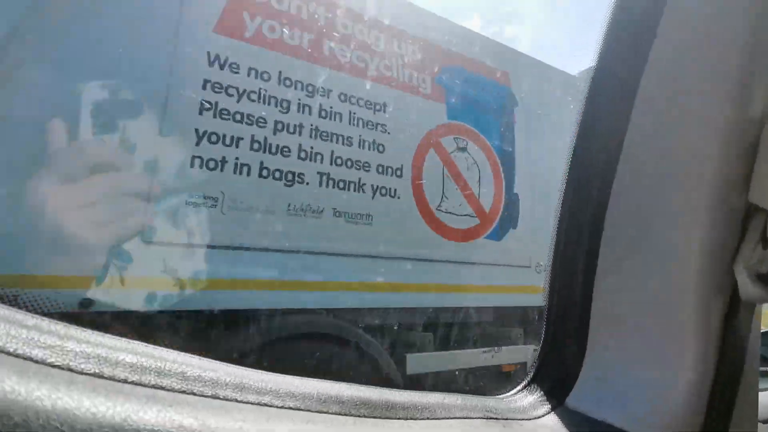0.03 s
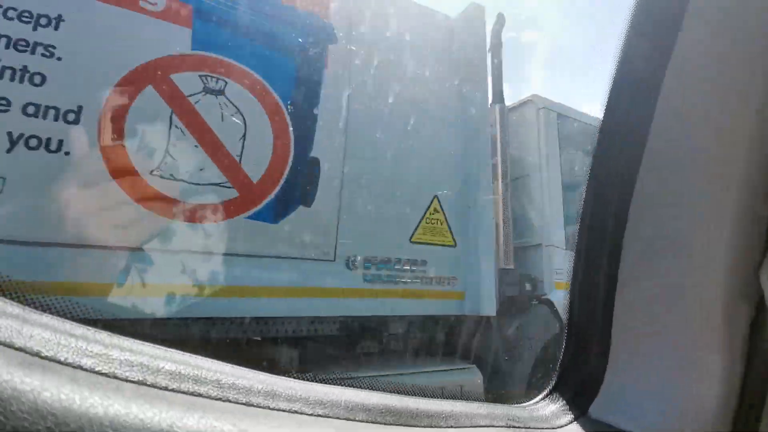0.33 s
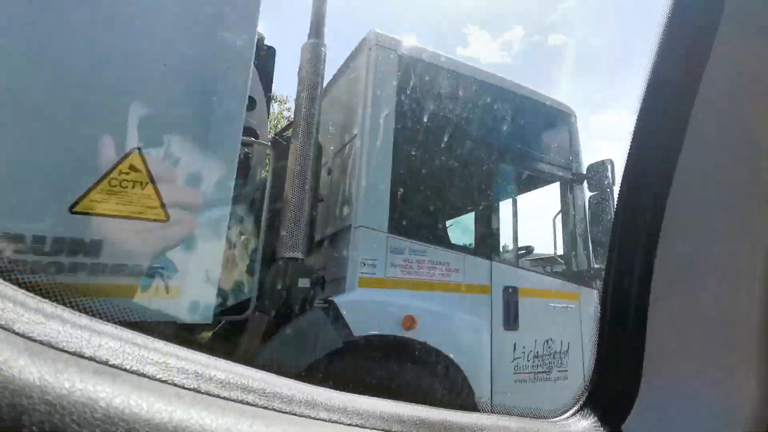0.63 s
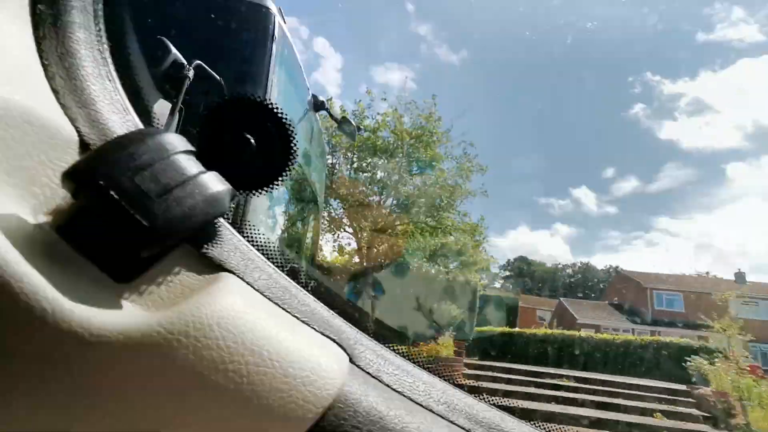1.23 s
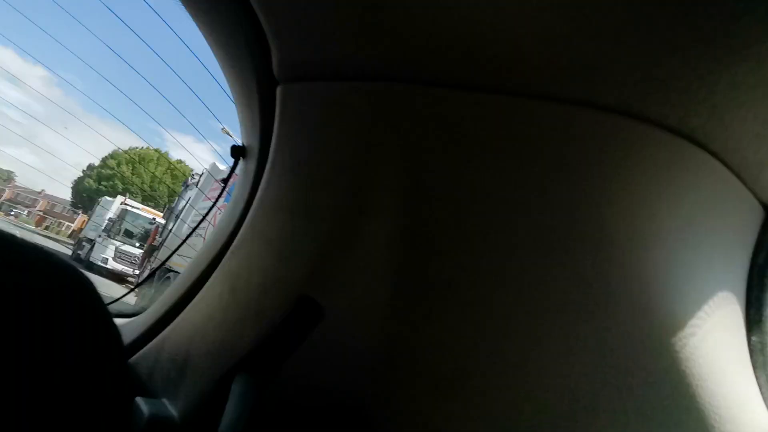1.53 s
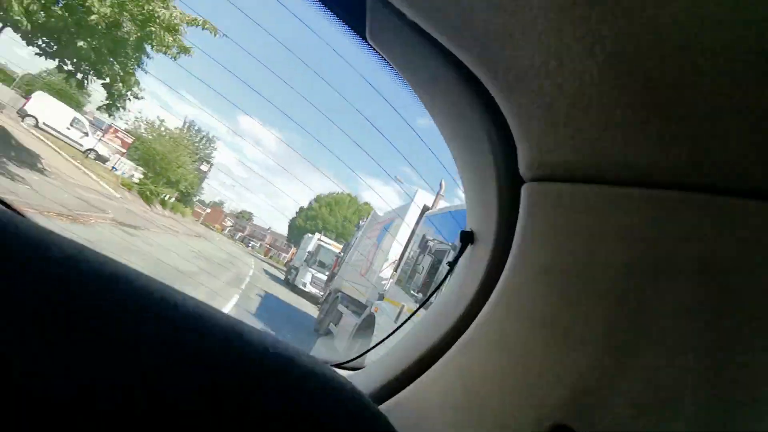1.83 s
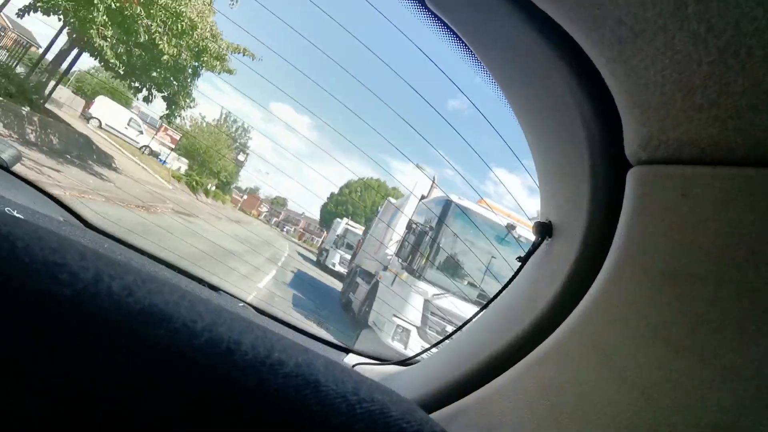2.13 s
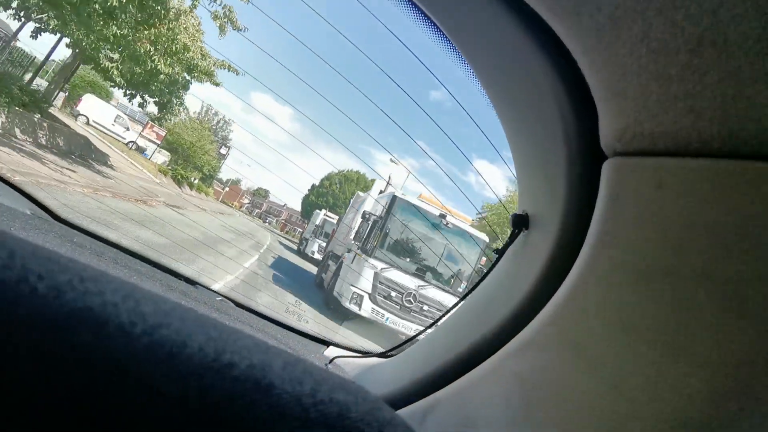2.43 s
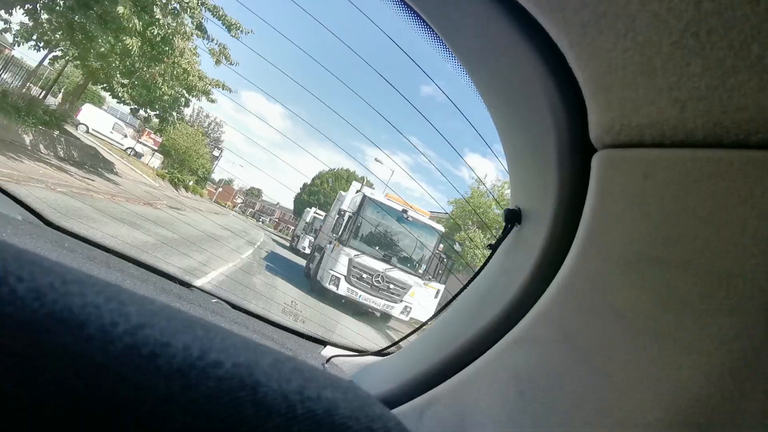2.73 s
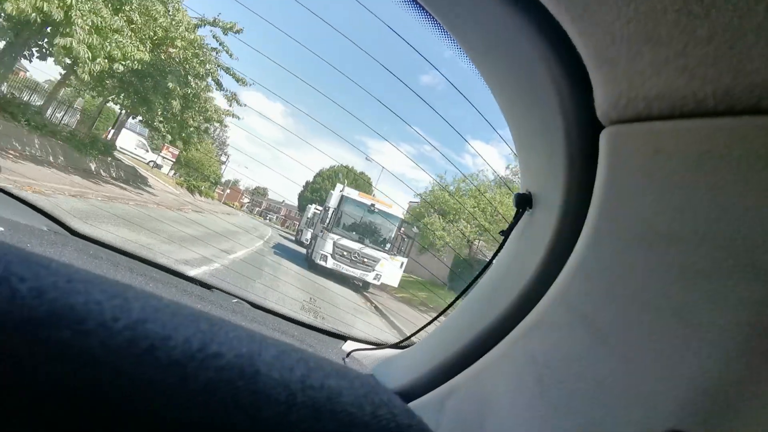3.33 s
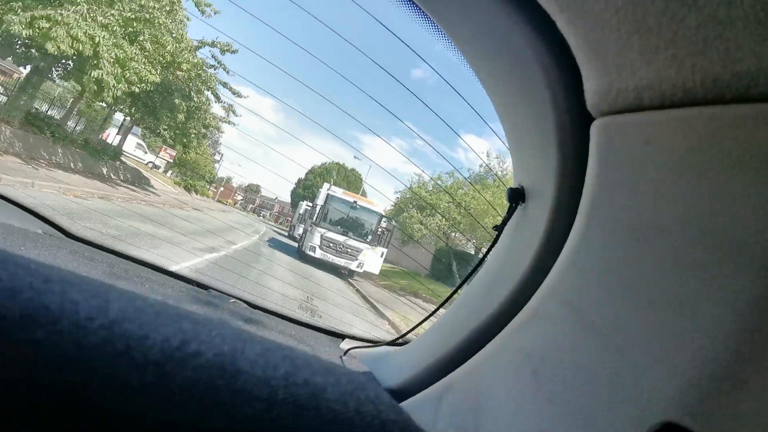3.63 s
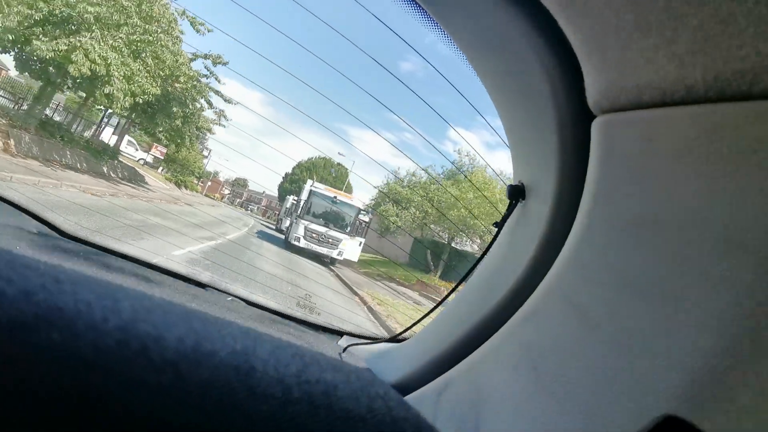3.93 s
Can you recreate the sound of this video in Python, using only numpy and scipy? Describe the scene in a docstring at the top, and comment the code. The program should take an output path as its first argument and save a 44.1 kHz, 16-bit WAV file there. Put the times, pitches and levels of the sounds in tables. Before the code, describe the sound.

Steady road rumble inside a moving car, with a lorry's diesel knock and brief brake hiss.

```python
"""Inside a small car passing an idling refuse lorry, over steady rumble, engine drone and tyre roar.
At first the lorry's diesel knocks, its machinery whines and air leaks thinly; a faint squeal comes
near 0.9 s. The clatter fades. At 1.5 s the air brake spurts and hisses briefly while road noise
swells past the cab. A dull, hollow knock sounds close on the right at 1.8 s. The cabin trim ticks
and rattles and the road thumps; loose trim chatters over a rough patch near 3.4 s."""
import sys
import numpy as np
from scipy import signal
from scipy.fft import rfft, irfft
from scipy.io import wavfile

SR = 44100
rng = np.random.default_rng(int(sys.argv[2]) if len(sys.argv) > 2 else 0)


def generate_wav(signal):
    """Clip the signal to [-1, 1] and save it as 16-bit WAV at the path in sys.argv[1]."""
    frames = np.transpose(np.atleast_2d(signal))
    scaled = np.clip(frames, -1, 1) * 32767
    pcm = np.round(scaled).astype(np.int16)
    wavfile.write(sys.argv[1], SR, pcm)


N = 176400

# Car body rumble. Each row: frequency in Hz, relative density in dB.
RUMBLE_SPECTRUM = [(8, -16), (21, -2), (39, 1.5), (59, -5), (83, -3), (112, -9), (166, -17.5), (250, -22.5),
                   (295, -25), (370, -41.5), (700, -67), (1500, -100)]
# Rumble envelope. Each row: time in seconds, level in dB.
RUMBLE_DB = [(0, -26), (1.7, -23), (2.2, -24), (3.2, -22.5)]
# Rumble likeness between ears. Each row: frequency in Hz, correlation from 0 to 1.
RUMBLE_COHERENCE = [(130, .97), (300, .88), (600, .5)]
# Rumble balance. Each row: frequency in Hz, L-R in dB.
RUMBLE_PAN = [(120, 10.3), (200, 8.5), (300, 3.5), (400, 0)]
# Low hums in the rumble, the lowest from the lorry's engine.
# Each row: centre in Hz, width in Hz, lift in dB.
HUM_PEAKS = [(134.8, 7.4, 7), (207.6, 34.4, 6.5), (238.7, 5.8, 5.5)]
# Car engine orders. Each row: multiple of the firing rate, level in dB.
DRONE_ORDERS = [(1, -27.5), (2, -30), (5, -42.5)]
# Tyre roar. Each row: frequency in Hz, relative density in dB.
TYRE_SPECTRUM = [(150, -4.5), (350, 7), (540, 4), (680, -2), (1100, -10.5), (1700, -24), (3000, -27.5),
                 (4500, -58), (16000, -53.5)]
# Tyre envelope. Each row: time in seconds, level in dB.
TYRE_DB = [(1.2, -52.5), (1.8, -52.5), (2.5, -51.5), (4, -49.5)]
# Tyre balance. Each row: frequency in Hz, L-R in dB.
TYRE_PAN = [(400, 0.5), (700, -1), (2400, -1.5)]
# Road noise beside the cab. Each row: frequency in Hz, relative density in dB.
SWELL_SPECTRUM = [(150, -17.5), (280, 4), (460, 5), (700, -23.5), (2000, -26.5)]
# Swell envelope. Each row: time in seconds, level in dB.
SWELL_DB = [(1.1, -61), (1.45, -52), (1.64, -44.5), (1.74, -65), (1.85, -77)]
# Swell balance. Each row: frequency in Hz, L-R in dB.
SWELL_PAN = [(300, -3.5), (500, 1), (1200, 11)]
# Shading of the car's noise on the right. Each row: time in seconds, gain in dB.
RIGHT_SHADE_DB = [(1.35, -2.2), (1.6, 0)]

# Road thumps. Each row: start in seconds, level in dB.
ROAD_THUMPS = [(2.275, -47), (2.717, -47), (3.236, -41)]
# Dull cabin rattles. Each row: start in seconds, level in dB.
CABIN_RATTLES = [(1.69, -54), (2.26, -59), (2.419, -57), (3.2375, -58), (3.286, -55), (3.408, -60.5),
                 (3.42, -64), (3.4695, -66), (3.4953, -60), (3.666, -59.5)]
# Trim ticks. Each row: start in seconds, body in dB, bright edge in dB.
TRIM_TICKS = [(2.004, -56, -49), (2.2697, -43, -39), (2.274, -32.5, -40), (2.277, -42, -52),
              (2.284, -50, -50), (2.3515, -46, -46), (2.403, -56, -47), (2.6138, -52, -42),
              (2.989, -46, -35)]
# Resonances of a dull, hollow knock. Each row: centre in Hz, level in dB.
TAP_MODES = [(520, -22), (1350, -32), (3600, -32.5)]

# Lorry's whine, metallic ring and squeal. Each row: time in seconds, pitch in Hz, level in dB.
WHINE_TRACK = [(0, 736, -71), (.75, 768.5, -63.5), (1.4, 832, -74)]
SHRILL_TRACK = [(0, 3340, -60), (.22, 3200, -53.5), (.45, 3010, -59), (.8, 2950, -74)]
SQUEAL_TRACK = [(.76, 10800, -88), (.88, 10800, -72), (1, 11200, -92)]
# Lorry's air leak. Each row: frequency in Hz, relative density in dB.
LEAK_SPECTRUM = [(1500, 4), (4000, 7.5), (5500, -1), (7000, 1), (8000, -2), (9900, -0.5), (10800, 1),
                 (13300, -7), (16000, -19)]
# Leak envelope. Each row: time in seconds, level in dB.
LEAK_DB = [(0, -57.5), (.75, -60.5), (1, -66), (1.98, -65), (2.12, -68.5), (2.3, -65.5), (2.38, -71.5),
           (2.47, -64.5), (2.65, -73), (3.6, -76)]
# Leak balance. Each row: frequency in Hz, L-R in dB.
LEAK_PAN = [(8000, 0.5), (9500, -2.5), (11000, -9.5), (15000, -8.5)]
# Air brake's jet and first spurt. Each row: frequency in Hz, relative density in dB.
JET_SPECTRUM = [(600, 0), (1500, 0), (2400, 2), (4500, 3.5), (6900, 0.5), (7900, -8), (9000, 3.5),
                (11000, -2), (13000, -2), (14000, -6), (15700, -6), (16500, -23)]
SPURT_SPECTRUM = [(800, -17.5), (2300, 0), (4500, -2.5), (6800, 2), (8500, -1), (11000, 0), (13000, -12),
                  (15700, -8), (16500, -32)]
# Jet and spurt balance. Each row: frequency in Hz, L-R in dB.
JET_PAN = [(1300, 8), (2400, -7), (8000, 2), (10000, -4), (12500, -18), (15000, -2)]
SPURT_PAN = [(2000, -5.5), (7000, 10.5), (13000, -2)]
# Seep, then spurt. Each row: time in seconds, level in dB.
SPURT_DB = [(1.25, -82), (1.38, -61), (1.475, -61), (1.492, -52.5), (1.503, -43.5), (1.525, -53.5),
            (1.6, -68), (1.75, -99)]

# Diesel clatter. Each row: frequency in Hz, relative density in dB.
DIESEL_SPECTRUM = [(300, -5.5), (590, -8), (900, 4), (1450, -2.5), (2050, -2.5), (2900, 2.5), (4200, -3.5),
                   (5600, -16), (8000, -35), (16000, -40)]
# Diesel balance. Each row: frequency in Hz, L-R in dB.
DIESEL_PAN = [(1000, -3.5), (2400, -6), (4400, -8.5), (8000, 0)]
# Engine block resonances. Each row: centre in Hz, width in Hz, lift in dB.
BLOCK_MODES = [(727, 97, 12), (1170, 120, 5.6), (2020, 160, 6.3), (2430, 160, 7.2), (2720, 120, 4),
               (3200, 54, 3.2)]
# Block ringing that reaches the car. Each row: time in seconds, power share from 0 to 1.
RING_SHARE = [(.35, 1), (.9, 0.1)]
# Diesel's dull body and bright knock. Each row: time in seconds, level in dB.
BODY_DB = [(.3, -57.5), (1, -63.5), (1.6, -62), (1.85, -73), (3, -78.5)]
KNOCK_DB = [(0, -49.5), (.18, -50), (.42, -50.5), (.72, -55.5), (.89, -60.5), (.98, -60), (1.6, -68),
            (1.85, -82), (2.3, -75.5), (4, -81.5)]
# Six cylinders in firing order. Each entry: gain in dB.
CYLINDER_GAIN_DB = [0, -1, -2.5, -1, 0, -.5]
# Harder firings. Each row: time in seconds, boost in dB.
HARD_FIRINGS = [(.174, 6.5), (.371, 4), (.536, 4), (1.162, 4.5)]
# Side window echo, left then right. Each row: initial delay in ms, gain from 0 to 1.
GLASS_ECHOES = [(1.05, .68), (2.5, .35)]

# Tyre likeness between ears. Each row: frequency in Hz, correlation from 0 to 1.
TYRE_COHERENCE = [(300, .45), (650, .045), (1400, .052)]
# Jet resonances. Each row: centre in Hz, width in Hz, lift in dB.
JET_MODES = [(2300, 260, 4), (6810, 100, 5.5), (10780, 100, 5.4)]

CAR_FIRING_HZ, LORRY_FIRING_HZ, FIRST_FIRING_S = 40.69, 30.35, .0096
TAP_S, CHATTER_S, CHATTER_SPREAD_S, CHATTER_DB = 1.7606, 3.38, .15, -67
JET_OPEN_S, JET_SHUT_S, JET_RISE_S, JET_RELEASE_S = 1.46, 1.727, .051, .053
JET_DB, JET_SAG_DB_PER_S = -52.5, -20
KNOCK_RISE_S, KNOCK_DECAY_S, KNOCK_SCATTER_DB, WHIRR_GAIN = .002, .009, .5, .48
BODY_CUTOFF_HZ, GLASS_SHRINK_PER_S, BAND_LIMIT_HZ = 1390, .15, 16300


def amp(db):
    """Decibels to gain."""
    return 10 ** (np.asarray(db) / 20)


def unit(x):
    """Scales to rms 1."""
    return x / np.sqrt(np.mean(x ** 2) + 1e-20)


def clock():
    """Sample times in seconds."""
    return np.arange(N) / SR


def curve(rows, column=1):
    """One column of a time table, at every sample."""
    rows = np.array(rows)
    return np.interp(clock(), rows[:, 0], rows[:, column])


def at_hz(rows, hz):
    """Interpolates a table over log frequency."""
    row_hz, value = np.transpose(rows)
    return np.interp(np.log(hz + 1), np.log(row_hz + 1), value)


def pan(side_db):
    """Stereo gains for an L-R difference."""
    return amp(np.array([[.5], [-.5]]) * side_db)


def add(mix, start_s, sound):
    """Mixes in a stereo sound."""
    part = mix[:, max(round(start_s * SR), 0):][:, :sound.shape[1]]
    part += sound[:, :part.shape[1]]


def drift(rate_hz):
    """Smooth random motion of rms 1."""
    hz = np.fft.rfftfreq(N, 1 / SR)
    return unit(irfft(rfft(rng.standard_normal(N)) * np.exp(-(hz / rate_hz) ** 2) * (hz > 0), N))


def noise(spectrum, balance, coherence=None, modes=()):
    """Coloured stereo noise, rms 1 before panning."""
    hz = np.fft.rfftfreq(N, 1 / SR)
    left, other = rfft(rng.standard_normal((2, N)))
    likeness = np.clip(at_hz(coherence, hz), -1, 1) if coherence else 0
    right = likeness * left + np.sqrt(1 - likeness ** 2) * other
    lift_db = sum(db / (1 + (2 * (hz - centre) / width) ** 2) for centre, width, db in modes)
    low_cut = np.minimum(hz / spectrum[0][0], 1) ** 2
    high_cut = np.minimum(spectrum[-1][0] / (hz + 1), 1) ** 4
    bins = np.array([left, right]) * amp(at_hz(spectrum, hz) + lift_db) * low_cut * high_cut
    return irfft(bins * pan(at_hz(balance, hz)), N) / irfft(bins, N).std()


def bell(hz, centre_hz, octaves):
    """Gain of a bell-shaped band with wide skirts."""
    return (1 + .5 * (np.log2((hz + 1) / centre_hz) / octaves) ** 2) ** -1.5


def burst(centre_hz, octaves, decay_s=.006, size=4096):
    """Brief contact: dense modes that die together."""
    age = np.arange(size) / SR / decay_s
    band = bell(np.fft.rfftfreq(size, 1 / SR), centre_hz, octaves)
    modes = unit(irfft(rfft(rng.standard_normal((2, size))) * band, size))
    hit = modes * (1 - np.exp(-4 * age)) * np.exp(-age)
    return hit / np.linalg.norm(hit, axis=1, keepdims=True) * np.sqrt(decay_s * SR / 2)


def snap(centre_hz, octaves, ring_db=-10, size=4096):
    """Impulse through a minimum-phase band, plus a faint ring; energy about 1."""
    hz = abs(np.fft.fftfreq(size, 1 / SR))
    log_gain = np.log(bell(hz, centre_hz, octaves))
    impulse = np.fft.ifft(np.exp(np.conj(signal.hilbert(log_gain)))).real
    return (unit(impulse) + amp(ring_db) * unit(burst(centre_hz, octaves))) / np.sqrt(size)


def tone(track, wobble_hz):
    """Unsteady sine that stops at its track's end."""
    turns = np.cumsum(curve(track) + wobble_hz * drift(rate_hz=wobble_hz)) / SR
    level_db = curve(track, column=2) + 2 * drift(rate_hz=48)
    return np.sin(2 * np.pi * turns) * amp(level_db) * (clock() < track[-1][0])


def engine_drone():
    """Orders of the car's wavering firing rate."""
    turns = np.cumsum(CAR_FIRING_HZ * (1 + .02926 * drift(rate_hz=4.265))) / SR
    drone = np.zeros(N)
    for order, db in DRONE_ORDERS:
        gain = amp(db) * (1 + drift(rate_hz=7) / 3)
        drone += gain * np.sin(2 * np.pi * (order * turns + rng.random()))
    return drone * pan(side_db=10.3)


def car():
    """Body rumble, drone, tyre roar and a swell beside the lorry's cab."""
    rumble = noise(RUMBLE_SPECTRUM, RUMBLE_PAN, RUMBLE_COHERENCE, HUM_PEAKS) * amp(curve(RUMBLE_DB))
    drone = engine_drone()
    tyres = noise(TYRE_SPECTRUM, TYRE_PAN, TYRE_COHERENCE) * amp(curve(TYRE_DB) + drift(rate_hz=47))
    swell = noise(SWELL_SPECTRUM, SWELL_PAN) * amp(curve(SWELL_DB))
    left, right = rumble + drone + tyres + swell
    return np.array([left, right * amp(curve(RIGHT_SHADE_DB))])


def trim():
    """Plastic ticks on the right; rattles and thumps over bumps."""
    out = np.zeros((2, N))
    for start_s, body_db, edge_db in TRIM_TICKS:
        body = amp(body_db) * snap(centre_hz=3700, octaves=.6)
        edge = amp(edge_db) * snap(centre_hz=12500, octaves=.25)
        add(out, start_s, pan(side_db=-17) * (body + edge))
    chatter = [(CHATTER_S + CHATTER_SPREAD_S * when, CHATTER_DB + 2 * force)
               for when, force in rng.standard_normal((22, 2))]
    for start_s, db in CABIN_RATTLES + chatter:
        add(out, start_s, amp(db) * pan(side_db=-6) * burst(centre_hz=2540, octaves=1 / 3))
    for start_s, db in ROAD_THUMPS:
        add(out, start_s, amp(db) * burst(centre_hz=615, octaves=.38))
    return out


def tap():
    """One dull, hollow knock close by the right microphone."""
    out = np.zeros((2, N))
    for hz, db in TAP_MODES:
        add(out, TAP_S, amp(db) * pan(side_db=-17) * snap(hz, octaves=.27))
    return out


def machinery():
    """The lorry's machinery whines, rings and briefly squeals."""
    whines = tone(WHINE_TRACK, wobble_hz=15.4) + tone(SHRILL_TRACK, wobble_hz=44.5)
    return whines * pan(side_db=-4) + tone(SQUEAL_TRACK, wobble_hz=170) * pan(side_db=-15)


def air_leak(pulse):
    """Thin hiss, pulsing slightly with the diesel."""
    hiss = noise(LEAK_SPECTRUM, LEAK_PAN)
    return hiss * pulse ** .25 * amp(curve(LEAK_DB) + .5 * drift(rate_hz=43))


def air_brake():
    """The valve seeps, spurts, blows with sagging pressure and shuts."""
    t = clock()
    opening = np.clip((t - JET_OPEN_S) / JET_RISE_S, 0, 1)
    closing = np.exp(-np.maximum(t - JET_SHUT_S, 0) / JET_RELEASE_S)
    jet = noise(JET_SPECTRUM, JET_PAN, modes=JET_MODES)
    jet_db = JET_DB + JET_SAG_DB_PER_S * (t - JET_OPEN_S) + .65 * drift(rate_hz=72)
    spurt = noise(SPURT_SPECTRUM, SPURT_PAN) * amp(curve(SPURT_DB) + .5 * drift(rate_hz=200))
    return jet * opening * closing * amp(jet_db) + spurt


def window_echo(sound):
    """The side glass combs each channel; the delay shrinks as the car passes."""
    t = clock()
    shrink = np.exp(-GLASS_SHRINK_PER_S * t)
    return np.array([ear + gain * np.interp(t - delay_ms / 1000 * shrink, t, ear)
                     for ear, (delay_ms, gain) in zip(sound, GLASS_ECHOES)])


def firing_pulse():
    """Diesel envelope: six unequal cylinders knock in turn over a steady whirr."""
    t, knocks = clock(), np.zeros(N)
    for k, scatter in enumerate(rng.standard_normal(int(N / SR * LORRY_FIRING_HZ))):
        start_s = FIRST_FIRING_S + k / LORRY_FIRING_HZ
        clank_db = sum(db for s, db in HARD_FIRINGS if abs(s - start_s) < .5 / LORRY_FIRING_HZ)
        level_db = CYLINDER_GAIN_DB[k % len(CYLINDER_GAIN_DB)] + clank_db + KNOCK_SCATTER_DB * scatter
        age_s = t - start_s
        on = (age_s > 0) & (age_s < .1)
        rise = 1 - np.exp(-(age_s[on] / KNOCK_RISE_S) ** 2)
        knocks[on] += amp(level_db) * rise * np.exp(-age_s[on] / KNOCK_DECAY_S)
    return unit(np.hypot(WHIRR_GAIN, 1.3 * knocks))


def diesel(pulse):
    """Each firing shakes the block: bright knock over a duller body."""
    share = np.clip(curve(RING_SHARE), 0, 1)
    ringing = np.sqrt(share) * noise(DIESEL_SPECTRUM, DIESEL_PAN, modes=BLOCK_MODES)
    plain = np.sqrt(1 - share) * noise(DIESEL_SPECTRUM, DIESEL_PAN)
    block = window_echo(ringing + plain)
    lows = signal.sosfiltfilt(signal.butter(4, BODY_CUTOFF_HZ, fs=SR, output="sos"), block)
    knock = unit(block - lows) * pulse * amp(curve(KNOCK_DB))
    body = unit(lows) * pulse ** .5 * amp(curve(BODY_DB))
    return knock + body


def scene():
    """Everything heard from the car seat."""
    cabin = car()
    pulse = firing_pulse()
    lorry = diesel(pulse) + air_leak(pulse) + machinery() + air_brake()
    return cabin + lorry + trim() + tap()


def record(dry):
    """Band limit, with 4 ms fades at the ends."""
    to_edge_s = np.minimum(clock(), clock()[::-1])
    fade = np.sin(np.pi / 2 * np.minimum(to_edge_s / .004, 1)) ** 2
    lowpass = signal.firwin(511, BAND_LIMIT_HZ, window=("kaiser", 9), fs=SR)
    return signal.oaconvolve(dry * fade, lowpass[None], "same")


dry = scene()
out = record(dry)
generate_wav(out)
```